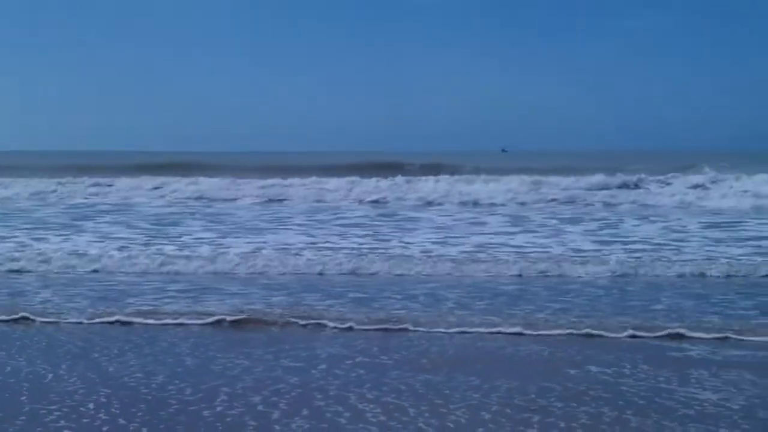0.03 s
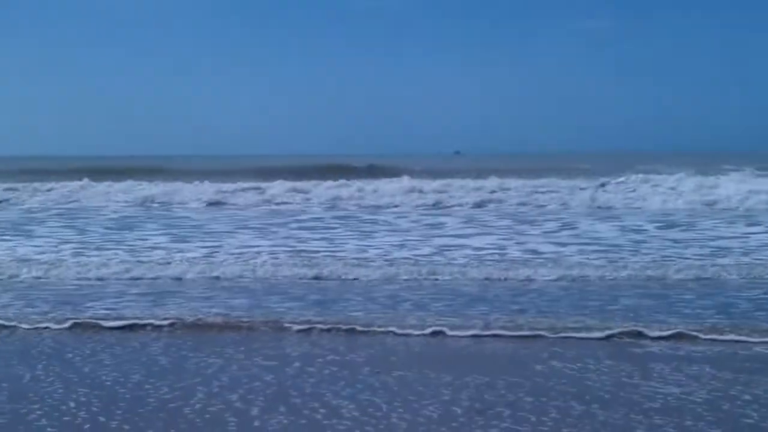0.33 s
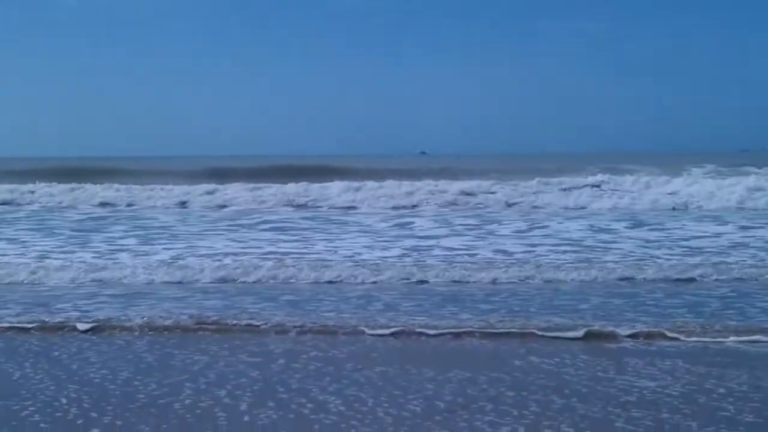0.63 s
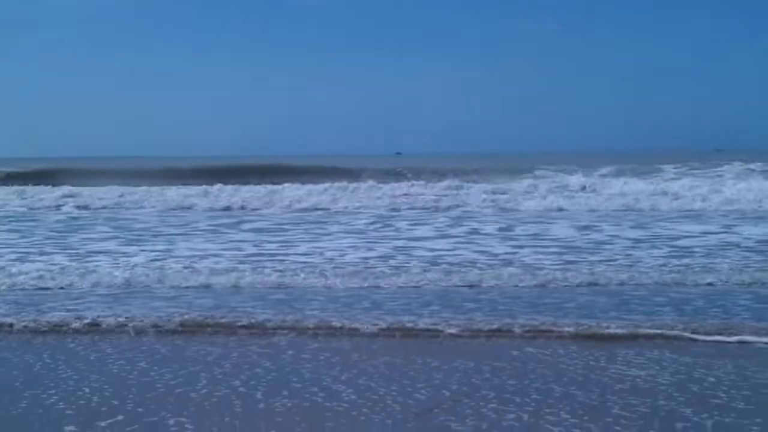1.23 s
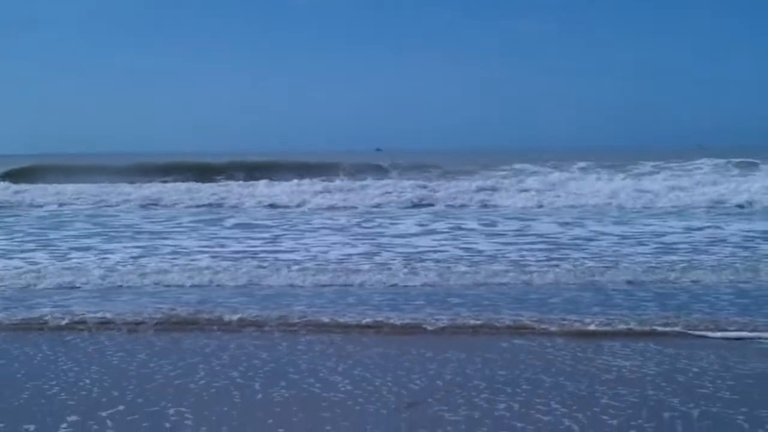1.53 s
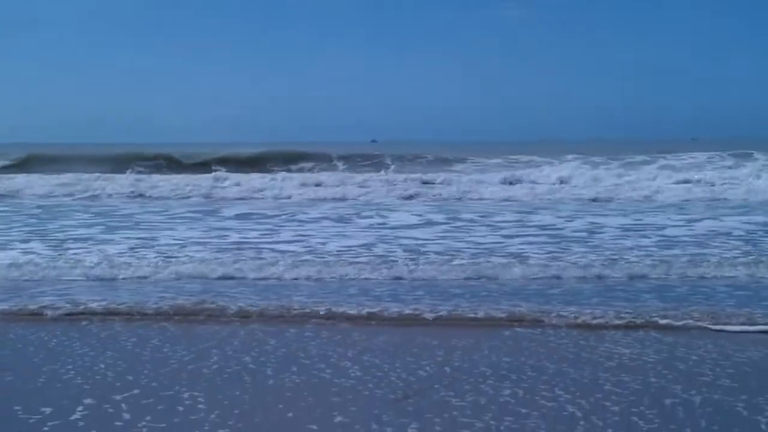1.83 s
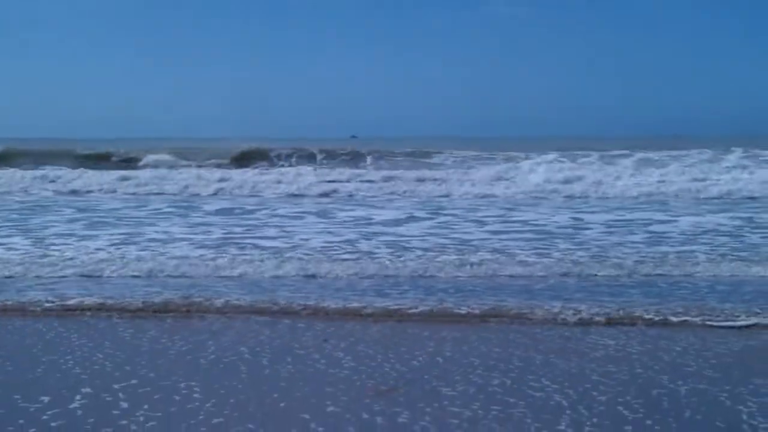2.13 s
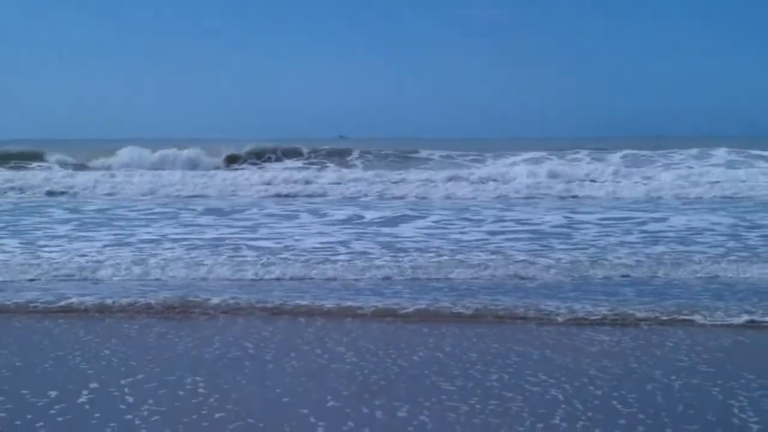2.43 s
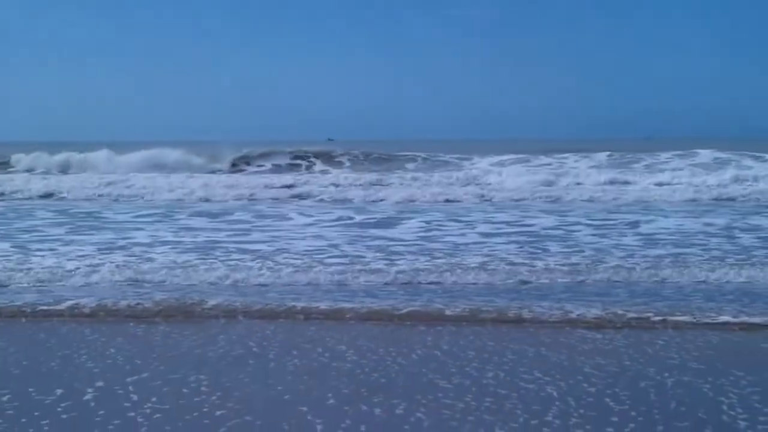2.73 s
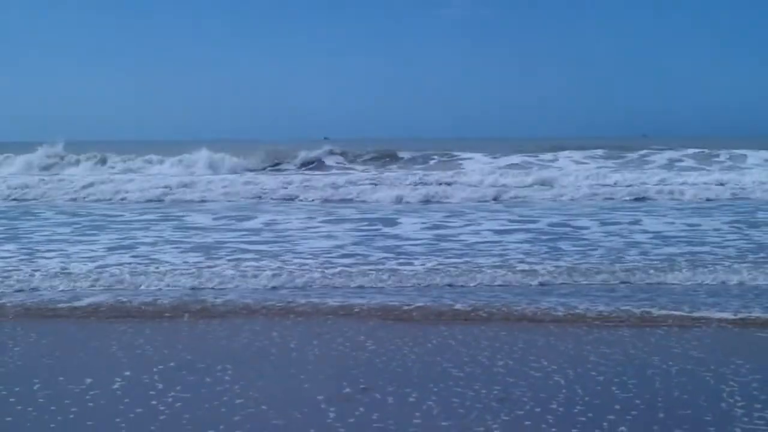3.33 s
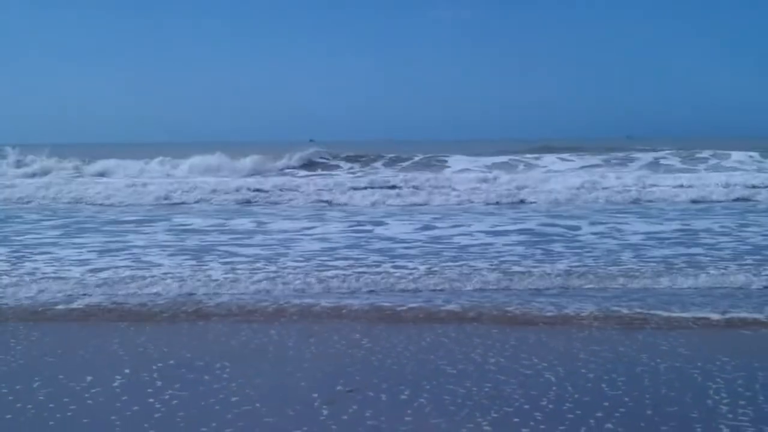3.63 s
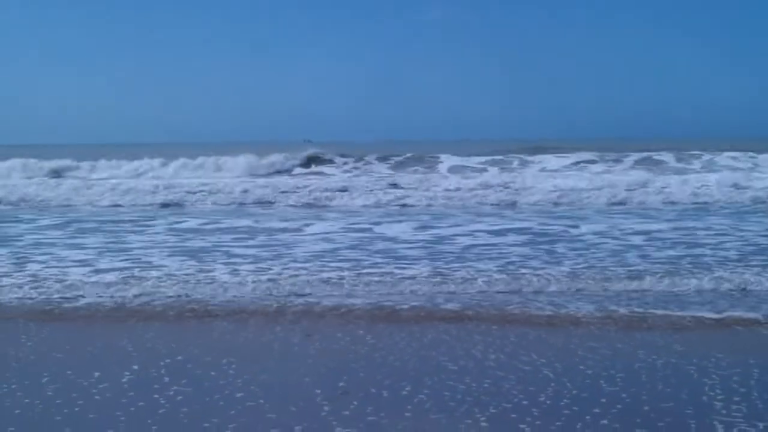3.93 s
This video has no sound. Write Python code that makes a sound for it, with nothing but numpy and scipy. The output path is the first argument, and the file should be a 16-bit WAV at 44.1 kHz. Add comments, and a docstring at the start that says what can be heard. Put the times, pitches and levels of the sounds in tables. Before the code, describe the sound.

Wind buffets the microphone throughout with a low, ragged rumble and small soft booms. Gusts peak around 2 seconds, ease between 2.5 and 3, then swell again near 3.5. Behind the wind, waves breaking on a sandy beach blend into a steady, deep roar. A faint fizz of foam sliding up the sand grows a little louder from about 3 seconds to the end at 4.

```python
"""Gusty sea wind buffets a microphone at the water's edge on a flat sandy beach.
Each gust makes the rumble louder, brighter and more ragged. Small swirls of air (eddies) burst
on the microphone as tiny puffs, and large ones roll past with a hollow boom.
Behind the wind, rows of breaking waves merge into a steady roar, and a thin sheet of foam
fizzes up the sand. The microphone adds a faint hiss of its own."""
import sys
import numpy as np
from scipy import signal
from scipy.fft import rfft, irfft
from scipy.io import wavfile
from scipy.ndimage import uniform_filter1d

SR = 44100
rng = np.random.default_rng(int(sys.argv[2]) if len(sys.argv) > 2 else 0)


def generate_wav(sig):
    """Save sig (samples, or channels by samples) to the path in sys.argv[1] as 16-bit PCM at SR."""
    pcm = np.round(np.clip(np.atleast_2d(sig).T, -1, 1) * 32767).astype(np.int16)
    wavfile.write(sys.argv[1], SR, pcm)


N = 176400  # 4 seconds

# wind strength at the microphone, relative to the strongest gust (time [s], level [dB])
GUSTS = [(0, -4.5), (.17, -6.5), (.36, -4), (.52, -4.5), (.62, -3), (.8, -3.8), (.9, -5.5), (1.02, -7),
         (1.12, -5), (1.24, -3), (1.34, -3), (1.48, -6), (1.58, -7), (1.7, -3), (1.81, -7.5), (1.92, -0.5),
         (2.03, -4), (2.13, -0.6), (2.21, -4.5), (2.29, -2.5), (2.37, -5.5), (2.45, -5), (2.52, -8),
         (2.6, -6.2), (2.75, -9), (2.92, -7), (3.03, -5), (3.17, -6.5), (3.33, -2), (3.46, -1.1),
         (3.55, -2.5), (3.63, 0), (3.71, -2.5), (3.77, -6.5), (4, -6)]
# tone of the wind's rumble in the strongest gust (frequency [Hz], relative level [dB])
RUMBLE_SPECTRUM = [(8, -18.5), (22, 2.5), (47, 2), (97, -3), (143, -1.5), (215, -1.5), (320, -1.5),
                   (460, -5.5), (600, -8), (775, -13), (1120, -21), (1830, -30), (3000, -46), (6000, -72.5)]
# tone of the breaking waves (frequency [Hz], relative level [dB])
SURF_SPECTRUM = [(20, 4), (85, -1), (140, 3), (300, 3), (410, -4), (580, -9), (800, -14), (1150, -18),
                 (1500, -15.5), (2000, -19), (2550, -22), (3100, -24), (4000, -34), (5500, -44.5),
                 (7500, -58), (11000, -64)]
# loudness of the foam running up the sand (time [s], relative level [dB])
FOAM_LEVELS = [(0, -5.5), (2.2, -5.2), (2.55, -3.5), (2.85, -5.5), (3.05, -2), (3.5, -1.8), (3.75, 1),
               (4, 1)]
# tone of the foam's fizz (frequency [Hz], relative level [dB])
FOAM_SPECTRUM = [(500, -9.5), (1800, 1.7), (2550, 1.5), (2800, 2), (3400, 2), (4000, -3.5), (4700, -4.5),
                 (6200, -11.5), (8000, -20.5), (14000, -36.5)]
# tone of the microphone's hiss (frequency [Hz], relative level [dB])
HISS_SPECTRUM = [(100, -3), (7000, -2), (9000, 3), (11000, 4.5), (13500, 2.5), (15700, -2.5)]
# large eddies rolling past (peak time [s], length [s], peak pitch [Hz], peak level [dB])
BOOMS = [(.04, 0.045, 277, -27), (0.484, .14, 305, -29.5), (0.76, 0.038, 230, -28),
         (1.098, 0.047, 139, -28), (1.2, 0.032, 237, -24), (1.387, 0.17, 272, -29.5),
         (1.752, .24, 268, -28), (1.958, 0.031, 365, -27), (2.461, 0.068, 294, -27),
         (2.575, .04, 310, -29.5), (3.442, 0.086, 205, -27), (3.7, 0.033, 307, -25)]


def amp(db):
    """Turns decibels into a number to multiply a sound by."""
    return 10 ** (np.asarray(db) / 20)


def unit(x):
    """Scales a signal so that its typical size (rms) is one."""
    return x / np.sqrt(np.mean(x ** 2) + 1e-20)


def at_time(points, t):
    """Reads a table at the times t, joining its points with straight lines."""
    return np.interp(t, *np.transpose(points))


def at_hz(points, hz):
    """Reads a spectrum table in dB, joining its points on a log-frequency axis."""
    table_hz, db = np.transpose(points)
    return np.interp(np.log(hz + 1), np.log(table_hz + 1), db)


def grid(size):
    """Times (a column) and frequencies (a row) for overlapping slices of `size` samples."""
    hop = size // 4
    return np.arange(N // hop + 6)[:, None] * hop / SR, np.fft.rfftfreq(size, 1 / SR)


def noise(gain):
    """Noise shaped by a gain for each time and frequency; all ones gives an rms of one."""
    size = 2 * (gain.shape[1] - 1)
    slices = gain * (rng.standard_normal(gain.shape) + 1j * rng.standard_normal(gain.shape))
    _, sound = signal.istft(slices.T, nperseg=size, noverlap=size * 3 // 4)
    return sound[:N] * np.sqrt(3 / size)


def wander(t, low_hz, top_hz):
    """A random wobble of typical size one, at rates from low_hz to top_hz."""
    rates = np.geomspace(low_hz, top_hz, num=40)
    return unit(sum(np.sin(2 * np.pi * (rate * t + rng.random())) for rate in rates))


def patches(t, hz, slices, bands):
    """Random blotches of typical size one, about `slices` long and `bands` wide on the grid."""
    speckle = rng.standard_normal((len(t), len(hz)))
    return unit(uniform_filter1d(uniform_filter1d(speckle, slices, axis=0), bands, axis=1))


def bell(t, centre, length):
    """A smooth rise and fall of height one."""
    return np.exp(-2 * ((t - centre) / length) ** 2)


def spread(make, width_db):
    """Makes stereo from a shared sound plus a weaker one, added left and subtracted right."""
    width = amp(width_db)
    return (make() + np.array([[1], [-1]]) * width * make()) / np.sqrt(1 + width ** 2)


def wind_rumble(level_db=-23.5, flutter_db=1.0, flutter_octaves=0.077, octaves_per_db=0.0253):
    """Swirling air hits the microphone; stronger wind sheds smaller, faster eddies and sounds brighter."""
    t, hz = grid(size=1024)
    gust_db = at_time(GUSTS, t)
    flutter = wander(t, low_hz=7, top_hz=39.97)
    stretch = 2 ** (octaves_per_db * gust_db + flutter_octaves * flutter)
    tone = amp(at_hz(RUMBLE_SPECTRUM, hz / stretch))
    tone /= np.sqrt(np.mean(tone ** 2, axis=1, keepdims=True))  # brightness alone adds no level
    return noise(tone * amp(level_db + gust_db + flutter_db * flutter))


def small_eddies(per_second=300, puff_s=0.00023, level_db=-39, spread_db=4.5):
    """Small eddies burst on the microphone's opening as brief puffs that roughen the gusts."""
    sizes = amp(spread_db * np.minimum(rng.exponential(1, N), 4))
    signs = rng.choice([-1, 1], N)
    bursts = sizes * signs * (rng.random(N) < per_second / SR)
    puff_time = np.arange(-256, 256) / SR / puff_s
    puff = np.tanh(puff_time) / np.cosh(puff_time)  # one rounded pull and push of pressure
    puffs = unit(signal.oaconvolve(bursts, puff)[:N])
    gust_db = at_time(GUSTS, np.arange(N) / SR)
    return puffs * amp(level_db + 1.84 * gust_db)  # puffs grow faster than the wind's rumble


def breaking_waves(level_db=-34, churn_db=1.5):
    """White water from many waves merges into one roar, churning in patches."""
    t, hz = grid(size=1024)
    churn = churn_db * patches(t, hz, slices=12, bands=7)
    tone = unit(amp(at_hz(SURF_SPECTRUM, hz)))
    return noise(tone * amp(level_db + churn))


def foam(level_db=-53.5, froth_db=1):
    """Foam slides up the sand: a fine, patchy fizz that grows as it comes nearer."""
    t, hz = grid(size=512)
    froth = froth_db * patches(t, hz, slices=16, bands=4)
    tone = unit(amp(at_hz(FOAM_SPECTRUM, hz)))
    return noise(tone * amp(level_db + at_time(FOAM_LEVELS, t) + froth))


def microphone_hiss(level_db=-72.5):
    """The faint, steady noise that the microphone makes by itself."""
    tone = amp(at_hz(HISS_SPECTRUM, np.fft.rfftfreq(N, 1 / SR)))
    white = rfft(rng.standard_normal(N))
    return amp(level_db) * unit(irfft(white * tone, N))


def booms(width_octaves=0.29, rise_octaves=0.12, steady_s=0.04):
    """Each large eddy swells and fades as a narrow band of rumble, highest in pitch at its peak."""
    t, hz = grid(size=1024)
    now, out = np.arange(N) / SR, np.zeros(N)
    for centre, length, pitch_hz, db in BOOMS:
        sag = rise_octaves * (1 - bell(t, centre, length))
        octaves_away = np.log2((hz + 1) / pitch_hz) + sag
        band = noise(np.exp(-0.5 * (octaves_away / width_octaves) ** 2))
        power = uniform_filter1d(band ** 2, round(steady_s * SR))
        steady_band = band / np.sqrt(abs(power) + 1e-20)  # evens out the noise's own swells
        out += amp(db) * bell(now, centre, length) * steady_band
    return out


def scene():
    """Wind and waves sit in the centre; a slight stereo spread widens the high fizz."""
    wind = wind_rumble() + booms() + small_eddies()
    return wind + breaking_waves() + spread(foam, width_db=-13)


def record(dry, left_delay_s=0.0000195, mono_below_hz=610, top_hz=15700):
    """Adds hiss, delays the left channel by a hair, centres the bass and cuts the highest treble."""
    hz = np.fft.rfftfreq(N, 1 / SR)
    left, right = rfft(dry + spread(microphone_hiss, width_db=-1.5))
    left = left * np.exp(-2j * np.pi * hz * left_delay_s)
    above_bass = 1 - np.exp(-(hz / mono_below_hz) ** 4)
    mid = irfft((left + right) / 2, N)  # what both channels share
    side = irfft(above_bass * (left - right) / 2, N)  # what makes the sound wide
    stereo = np.array([mid + side, mid - side])
    low_pass = signal.firwin(401, top_hz, window=("kaiser", 9), fs=SR)
    return signal.oaconvolve(stereo, low_pass[None], "same", axes=1)


dry = scene()
out = record(dry)
generate_wav(out)
```